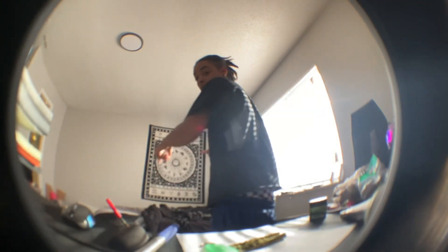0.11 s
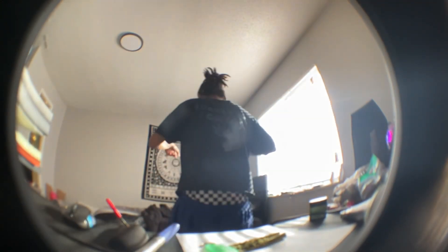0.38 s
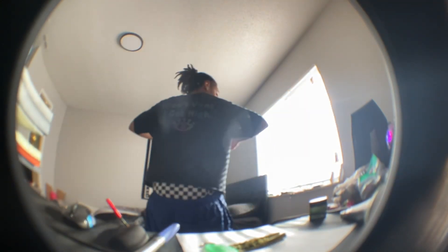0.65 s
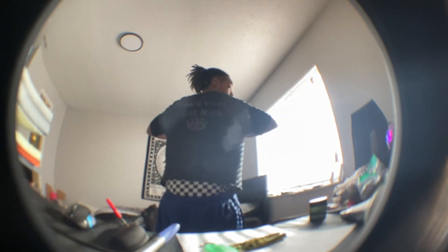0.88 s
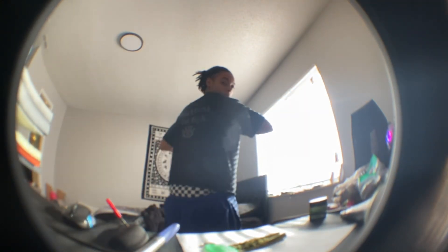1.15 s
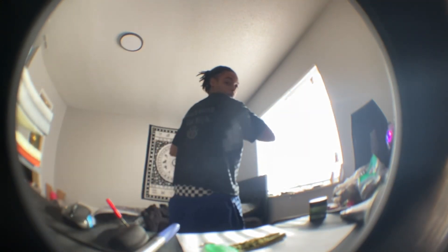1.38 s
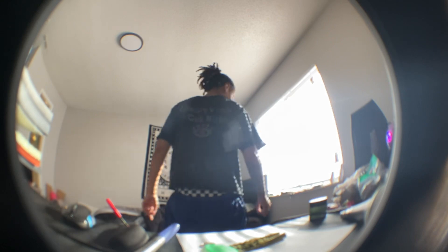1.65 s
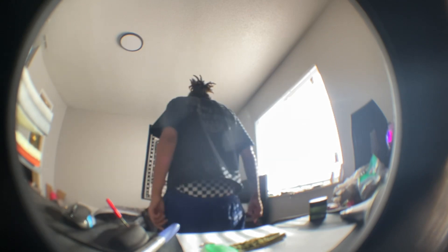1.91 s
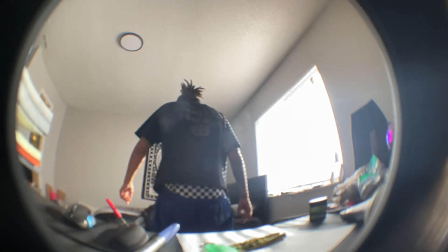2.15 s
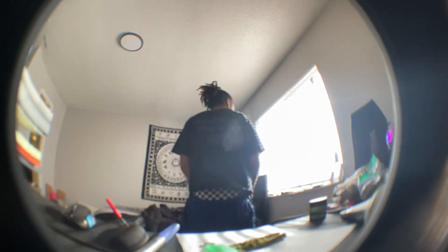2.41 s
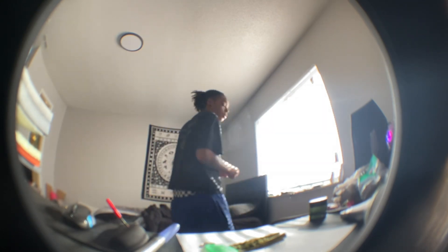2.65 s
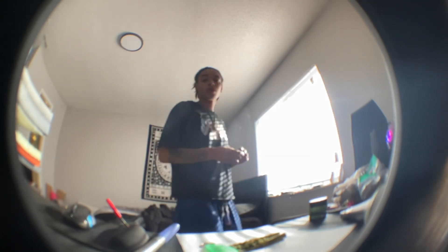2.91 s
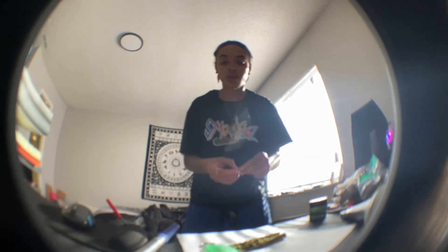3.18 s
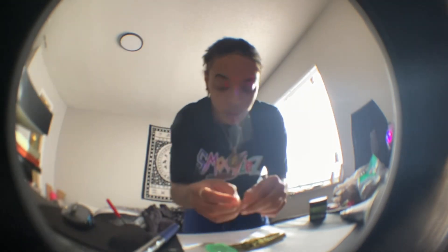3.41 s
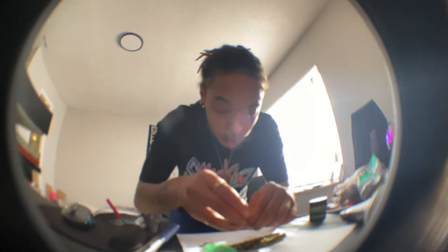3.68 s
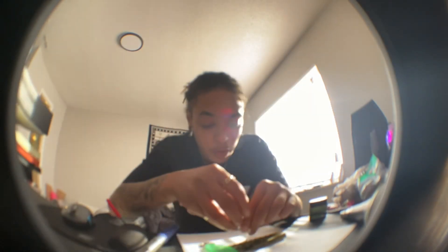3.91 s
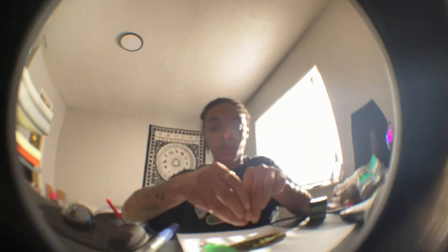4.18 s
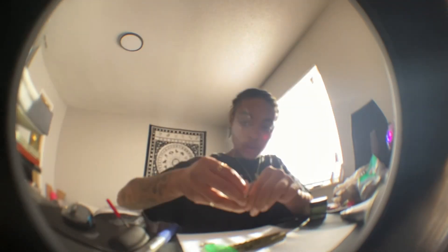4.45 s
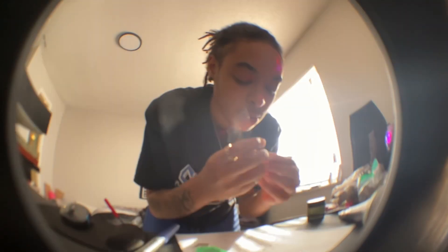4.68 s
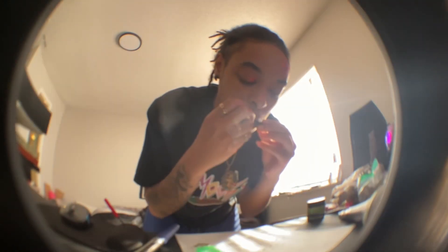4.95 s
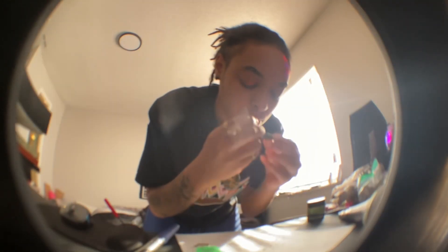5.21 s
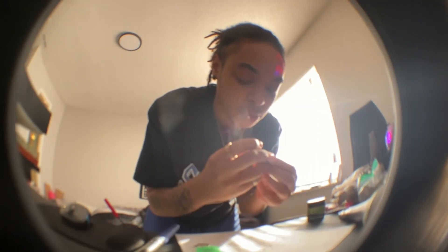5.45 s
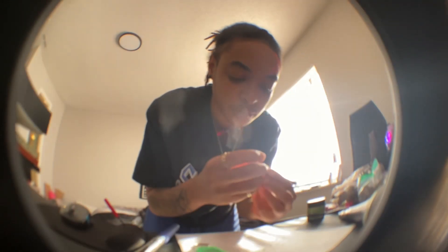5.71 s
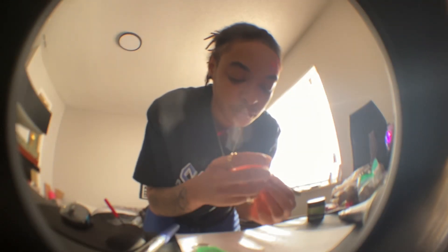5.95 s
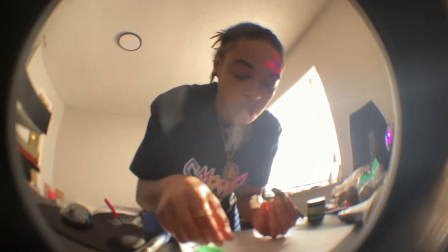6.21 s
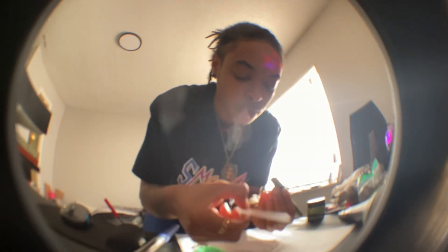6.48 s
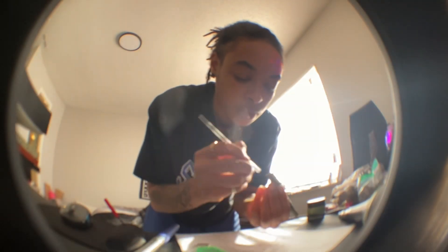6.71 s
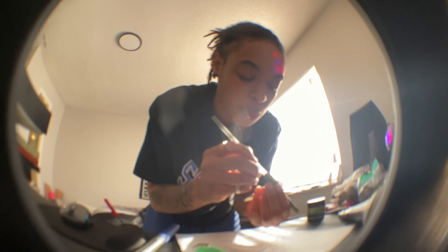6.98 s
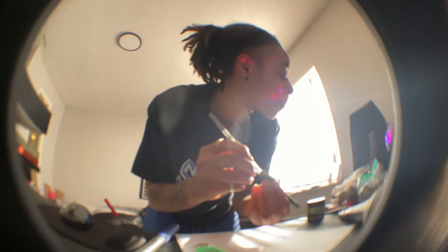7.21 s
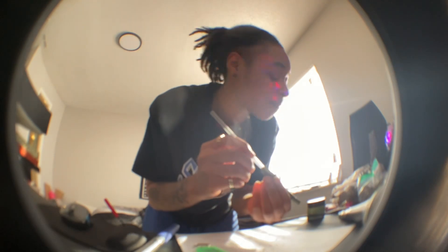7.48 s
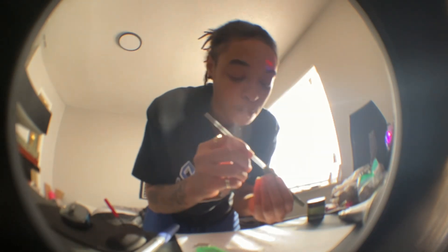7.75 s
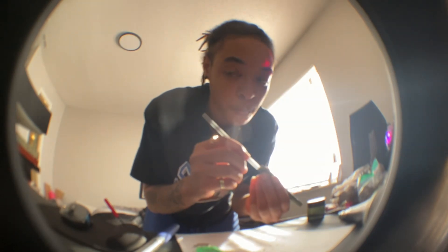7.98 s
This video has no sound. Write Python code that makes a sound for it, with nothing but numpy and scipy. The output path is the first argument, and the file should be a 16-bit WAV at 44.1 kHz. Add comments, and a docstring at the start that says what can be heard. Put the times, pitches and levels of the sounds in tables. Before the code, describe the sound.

Low pulsing ventilation hum in a quiet bedroom, soft cloth rustle and finger clicks; a brief dip, louder hum, then firm clicks and short scrapes.

```python
"""A quiet bedroom at a two-port desk microphone: ventilation hum (beating sines, filtered noise) and floor rumble.
First clothes rustle (grainy noise), with finger clicks (ringing cracks) and forearm bumps (decaying sines).
Near 4.55 s all sound dips briefly; the hum returns 6.2 dB louder and the rumble a little stronger.
Sparse clicks follow, from 6.3 s with knocks and paper strokes; near 7.2 s firm clicks and
scrapes (rapid ringing slips), then a few lighter clicks over the hum."""
import sys
import numpy as np
from scipy import signal
from scipy.fft import rfft, irfft, next_fast_len
from scipy.io import wavfile
from scipy.ndimage import uniform_filter1d, map_coordinates

SR = 44100
rng = np.random.default_rng(int(sys.argv[2]) if len(sys.argv) > 2 else 0)


def inscribe(sig):
    """Save sig as 16-bit PCM at rate SR to the path in sys.argv[1].

    A 1-D sig is mono; a 2-D sig holds one channel per row.
    Samples are clipped to [-1, 1] before scaling.
    """
    pcm = np.round(np.clip(np.atleast_2d(sig).T, -1, 1) * 32767)
    wavfile.write(sys.argv[1], SR, pcm.astype(np.int16))


def nominal_scale(level):
    """Amplitude ratio for a level in decibels (scalar or array-like)."""
    x = np.asarray(level, float) / 20
    return 10 ** x


N = 357651
TIME = np.arange(N) / SR
HANDS_LEFT_DB = 9  # left over right port: the hands work left of the microphone


def unit(x):
    """Scaled to rms 1."""
    return x / np.sqrt(np.mean(x ** 2) + 1e-20)


def mid_unit(pair):
    """Scaled so that the mean of the ports has standard deviation 1."""
    return pair / np.std(pair.mean(axis=0))


def along(points, hz):
    """(Hz, value) points interpolated on a log frequency axis."""
    point_hz, values = np.transpose(points)
    return np.interp(np.log(hz + 1), np.log(point_hz + 1), values)


def curves(rows):
    """One value per sample for each column after the time."""
    times_s, *columns = np.transpose(rows)
    return [np.interp(TIME, times_s, column) for column in columns]


def wobble(rate):
    """A smooth random curve, rate knots a second."""
    knots = rng.standard_normal(int(N * rate / SR) + 4)
    return map_coordinates(knots, [TIME * rate])


def filtered(x, response):
    """x times a complex response of frequency."""
    size = next_fast_len(x.shape[-1] + 8192)
    spectrum = rfft(x, size) * response(np.fft.rfftfreq(size, 1 / SR))
    return irfft(spectrum, size)[..., :x.shape[-1]]


def resonant(modes):
    """Causal response of (Hz, width Hz, dB) resonances, alternating in sign."""
    def mode(f, centre_hz, width_hz, db):
        damping = 1j * f * width_hz
        return nominal_scale(db) * damping / (centre_hz ** 2 - f * f + damping)
    return lambda f: sum((-1) ** k * mode(f, *row) for k, row in enumerate(modes))


def patchy(noise, depth_db):
    """Noise with random louder and softer patches in time and frequency."""
    z = signal.stft(noise, nperseg=512)[2]
    field = uniform_filter1d(rng.standard_normal(z.shape[1:]), size=5, axis=0)
    field = uniform_filter1d(field, size=9, axis=1)
    return signal.istft(z * nominal_scale(depth_db * unit(field)), nperseg=512)[1][:, :N]


def ports(source, alike, lead, balance_db):
    """Two ports: shared noise offset in phase (left leads where lead > 0), plus each port's own noise."""
    side = np.array([[.5], [-.5]])

    def shared_response(f):
        turn = np.exp(1j * side * lead(f))
        return np.sqrt(np.clip(alike(f), 0, 1)) * turn * nominal_scale(side * balance_db(f))

    def own_response(f):
        return np.sqrt(1 - np.clip(alike(f), 0, 1)) * nominal_scale(side * balance_db(f))

    return filtered(source[0], shared_response) + filtered(source[1:], own_response)


def tone(hz, left_db, right_db, lead, phase):
    """A sine with its own rms level and phase at each port."""
    angle = 2 * np.pi * hz * TIME + phase + np.array([[0], [-lead]])
    return np.sqrt(2) * nominal_scale([[left_db], [right_db]]) * np.cos(angle)


def hum():
    """Ventilation: mains buzz and fan tone beat 4.6 times a second, with other tones and booming air."""
    # stretches of hum: (start [s], gain [dB], time the beating tones cancel at the left [s])
    stretches = [(0, 0, 2.151), (4.553, 6.2, 6.4)]
    # mains buzz, fan: (frequency [Hz], left [dB before gain], right [dB before gain], left lead [rad])
    beating = [(240, -41.1, -45.7, .4), (235.385, -45.4, -54.8, .27)]
    # other tones: (frequency [Hz], left, right [dB before gain and wobble], left lead [rad before wobble])
    other_tones = [(36.02, -71, -71, .1), (57.7, -71, -71.5, -.15), (129.78, -56.3, -56.8, .15),
                   (471.6, -61, -69.5, .8), (479.98, -66.5, -74.5, 2), (516, -61.5, -70, .7),
                   (960, -69.5, -75, 1.5), (1200, -77, -80, 2)]
    # moving air spectrum: (frequency [Hz], relative density [dB per Hz])
    air_spectrum = [(22, -46), (36, -28), (85, -21), (200, -6.5), (300, -13.5), (450, -15), (700, -20.5),
                    (1000, -23.5), (1500, -27.5), (2000, -30), (2600, -42.5), (3300, -42), (6000, -53.5),
                    (16000, -65.5)]
    # where the air booms: (frequency [Hz], width [Hz], added amplitude [dB re plain air])
    room_modes = [(358.7, 29, 2.5), (632.5, 25, -1.5), (1210, 35, -3), (1600, 340, -4.5),
                  (3300, 640, -11.5)]
    # air shared by the ports: (frequency [Hz], power fraction [0-1])
    air_alike = [(22, .99), (60, .93), (120, 0.99), (300, 0.8), (700, 0.46), (2000, 0.93), (4000, 0.2),
                 (9000, .2)]
    # air phase between ports: (frequency [Hz], left lead [rad])
    air_lead = [(30, 0.1), (120, 0.8), (240, -0.5), (600, 0.73), (1290, 2.5), (2330, 4), (2670, -2.5),
                (3450, 4), (5170, 8.5)]
    # air level between ports: (frequency [Hz], left over right [dB])
    air_balance = [(25, 1.2), (120, -7), (200, 13), (380, 2.5), (700, 5), (1290, -0.5), (2380, 2.5),
                   (4400, 2.5), (15000, 0)]

    index = np.searchsorted([start for start, _, _ in stretches], TIME, "right") - 1
    gain_db, cancel_s = np.transpose(stretches)[1:, index]
    phase = rng.uniform(0, 2 * np.pi)
    buzz, fan = beating
    fan_phase = phase + np.pi + 2 * np.pi * (buzz[0] - fan[0]) * cancel_s
    pair = tone(*buzz, phase) + tone(*fan, fan_phase)
    rest = 0
    for row in other_tones:
        swell = nominal_scale(2.7 * wobble(1.97))
        rest = rest + swell * tone(*row, rng.uniform(0, 2 * np.pi) + 0.37 * wobble(1.5))

    ripple_knots = rng.standard_normal(2400)

    def air_response(f):
        boom = 1 + sum(nominal_scale(db) / (1 + (2 * (f - c) / w) ** 2) for c, w, db in room_modes)
        ripple = nominal_scale(1.33 * map_coordinates(ripple_knots, [f / 12]))  # the room's many small modes
        return nominal_scale(along(air_spectrum, f)) * boom * ripple

    noise = filtered(patchy(rng.standard_normal((3, N)), depth_db=1.65), air_response)
    air = ports(noise, lambda f: along(air_alike, f), lambda f: along(air_lead, f),
                lambda f: along(air_balance, f))
    air = nominal_scale(-48.5 + 0.24 * wobble(2.4)) * unit(air)
    return nominal_scale(gain_db) * (pair + rest + air)


def rumble():
    """The building through the floor: broad rumble and narrow drone swell together and wander apart."""
    # rumble, drone: (frequency [Hz], width [octaves], left over right [dB], level re shaking [dB], wander [dB])
    bands = [(89.4, .3, 5, -4.5, 1.5), (111.07, .039, -3.5, 0, 0.5)]
    # floor shaking, one list per hum stretch: (time [s], level [dB])
    shaking = [
        [(0, -54), (1.3, -53.5), (2.3, -48.5), (3.4, -51.5), (4.5, -49.5)],
        [(4.62, -47.5), (6.2, -51), (7.3, -49.5), (8.1, -47)],
    ]
    out = 0
    shake_db, = curves(sum(shaking, []))
    for hz, octaves, balance_db, db, wander_db in bands:
        noise = filtered(rng.standard_normal((3, N)),
                         lambda f: np.exp(-.5 * (np.log2((f + 1) / hz) / octaves) ** 2))
        pair = ports(noise, lambda f: 0.974 + 0 * f, lambda f: 0 * f, lambda f: balance_db + 0 * f)
        pair = mid_unit(pair)
        # a machine drives it: steadier than free noise
        evened = pair / (1.4 + abs(signal.hilbert(pair.mean(axis=0))))
        out = out + nominal_scale(shake_db + db + wander_db * wobble(3)) * mid_unit(evened)
    return out


def rustle():
    """Cloth, later paper: uneven tiny snaps as dull and bright hiss; strokes swell over a faint rustle."""
    # faint unbroken rustle of someone moving, from 4.6 s a steady faint hiss: (time [s], dull level [dB before
    # swing], bright over dull [dB])
    fidget = [(0, -74.5, -16), (.7, -78.5, -9), (1.25, -89, -10), (1.9, -83.5, -11), (3, -78, -15),
              (3.62, -85, -9.5), (3.9, -71.5, -13.5), (4.5, -73, -13), (4.6, -84, -5), (8.11, -84, -5.5)]
    # strokes of cloth, later paper: (peak [s], rise [s], fall [s], dull peak [dB], bright over dull [dB])
    strokes = [(.005, .05, 0.25, -61.5, -11.5), (.13, 0.091, .12, -63.5, -21),
               (.25, 0.075, 0.18, -70, -9.5), (.81, .15, 0.18, -73, -15), (1.06, .04, 0.065, -81, -3.5),
               (1.86, 0.1, .14, -76, -13), (2.04, .12, 0.14, -74, -11.5), (2.17, .08, .18, -76, -13.5),
               (2.32, .07, .25, -75, -15), (2.51, 0.086, 0.24, -72, -21), (2.64, 0.09, 0.061, -67, -20.5),
               (2.76, 0.062, 0.24, -68, -13), (3.14, 0.45, 0.36, -68.5, -14.5),
               (3.23, 0.22, 0.067, -71.5, -7), (3.34, 0.06, 0.2, -68, -16.5), (3.76, .12, .4, -71, -16),
               (3.89, .25, 0.14, -67.5, -11.5), (4.18, 0.25, .11, -70.5, 5), (4.3, .07, 0.27, -72.5, 3.5),
               (4.49, 0.3, .08, -72, -11.5), (6.345, 0.018, 0.078, -61.5, 0),
               (6.38, .05, 0.021, -66.5, -6.5), (7.14, .004, 0.088, -54.5, -17.5),
               (7.17, 0.05, .028, -53, -25.5), (7.255, 0.11, .04, -67, -5), (7.337, .003, 0.039, -43, -8),
               (7.37, 0.062, .07, -59.5, -7), (7.405, 0.055, 0.02, -65.5, -6), (7.94, .03, .04, -80.5, 3.5),
               (7.99, .009, 0.054, -65, -1)]
    # dull and bright hiss, one list each: (frequency [Hz], relative density [dB per Hz])
    hiss_spectra = [
        [(700, -18.5), (1500, 0.5), (3500, -1), (6000, -11), (9000, -11), (16000, -48)],
        [(3000, -26), (6000, -1.5), (8000, -1.5), (12500, -4.5), (14500, -4), (16000, -16)],
    ]
    swing_db, swing_rate_hz = 2, 13
    fade_db = 20  # lost over one rise or fall time

    level_db, bright_db = curves(fidget)
    steady_db = level_db + swing_db * wobble(swing_rate_hz)
    power = nominal_scale(steady_db + [0 * bright_db, bright_db]) ** 2
    for peak_s, rise_s, fall_s, db, bright_db in strokes:
        fade = np.maximum((peak_s - TIME) / rise_s, (TIME - peak_s) / fall_s)
        near = fade < 3
        power[:, near] += nominal_scale(db - fade_db * fade[near] + [[0], [bright_db]]) ** 2

    grain = nominal_scale(0.78 * wobble(900) + 1.7 * wobble(40))
    out = 0
    for part, spectrum, lead_samples in zip(power, hiss_spectra, [7.5, 3.5]):
        hiss = patchy(grain * rng.standard_normal((3, N)), depth_db=3.0)
        hiss = filtered(hiss, lambda f: nominal_scale(along(spectrum, f)))
        pair = ports(hiss, lambda f: 0.56 + 0 * f, lambda f: 2 * np.pi * f * lead_samples / SR,
                     lambda f: 5 + 0 * f)
        out = out + np.sqrt(part) * mid_unit(pair)
    return out


def room(x):
    """Room answer: noise in which each frequency dies at its own speed, 150 samples late."""
    # decay: (frequency [Hz], time to fall 60 dB [s])
    decay = [(500, 0.22), (2000, 0.27), (10000, 0.046)]
    hz, t, z = signal.stft(rng.standard_normal((2, SR // 3)), SR, nperseg=256)
    z = z * nominal_scale(-60 * t / along(decay, hz)[:, None])
    tail = signal.istft(z, SR, nperseg=256)[1]
    late = np.pad(x, (150, 0))[None]
    return signal.fftconvolve(late, tail / np.linalg.norm(tail[0]), axes=1, mode="full")


def clicks():
    """A finger crack rings the spot, the hard thing (more if firm) and its hollow part; right port first."""
    # (time [s], peak [dB before port balance], spot ring [Hz], hollow ring [dB before decay, balance], its pitch [Hz])
    touches = [(.119, -54, 3200, -42.5, 1640), (0.132, -51, 2500, -45, 1160), (0.84, -51, 2140, -70, 1500),
               (2.754, -51, 4500, -74, 1500), (2.76, -57.5, 7000, -70, 1500),
               (2.807, -48.5, 3000, -70, 1500), (4.332, -48.5, 2300, -47, 1510),
               (4.806, -45.5, 2900, -70, 1500), (4.809, -52, 4200, -70, 1500), (5.14, -61, 8500, -71, 1490),
               (5.587, -54.5, 5500, -71, 1500), (6.314, -63.5, 2010, -44, 1650),
               (6.338, -49, 12800, -41, 980), (6.342, -51, 11460, -70, 1500),
               (6.346, -44, 4500, -33.5, 1566), (6.363, -57.5, 8940, -44, 1560),
               (6.377, -54, 11000, -74, 1500), (6.689, -56, 3480, -64, 1500),
               (7.1344, -38, 3030, -32, 1210), (7.136, -44, 2000, -40, 1930), (7.149, -47, 3300, -48, 1620),
               (7.1587, -49, 3400, -46, 1300), (7.1643, -38, 3300, -37, 1000),
               (7.244, -58, 3000, -42, 1490), (7.252, -54.5, 9000, -42, 1550),
               (7.336, -31.5, 2410, -23.5, 1443), (7.34, -29, 3300, -35, 1750),
               (7.345, -45, 10300, -47, 1480), (7.611, -58.5, 7760, -73, 1510),
               (7.938, -54.5, 7960, -61, 1500), (7.9853, -44.5, 8200, -68, 1490),
               (7.9943, -58.5, 7950, -62, 1500)]
    # resonances of the hard thing: (frequency [Hz], width [Hz], relative strength [dB])
    hard_modes = [(2340, 62, -1), (3300, 150, 9), (3880, 110, -0.5), (5140, 160, -8.5), (7000, 110, -10.5),
                  (8200, 170, -10), (10300, 140, -6.5), (13200, 240, -10)]
    out, t = np.zeros((2, N + SR)), np.arange(2048) / SR
    for s, db, bright_hz, hollow_db, hollow_hz in touches:
        crack = (rng.standard_normal(len(t)) + 5 * (t == 0)) * nominal_scale(-60 * t / .004)
        spot = resonant([(bright_hz, bright_hz * .16, 0)])
        firm = np.clip((db + 50) / 8, .12, 1)
        hard = filtered(crack, lambda f: spot(f) + firm * (0.8 * resonant(hard_modes)(f) + 0.077 * (f > 1800)))
        onset = 1 - np.exp(-t / .0006)
        hollow = nominal_scale(-60 * t / .025) * np.sin(2 * np.pi * hollow_hz * t) * onset
        click = nominal_scale(db) * hard / abs(hard).max() + nominal_scale(hollow_db) * hollow
        wet = nominal_scale(-11) * room(click)
        wet[0, 5:5 + len(t)] += nominal_scale(HANDS_LEFT_DB / 2) * click
        wet[1, :len(t)] += nominal_scale(-HANDS_LEFT_DB / 2) * click
        out[:, round(s * SR):][:, :wet.shape[1]] += wet
    return out[:, :N]


def bumps():
    """A soft blow: a cycle or two of the desk top, nearly alike at both ports."""
    # knocks through the desk top: (time [s], approximate peak [dB before port balance], frequency [Hz])
    knocks = [(.13, -39, 690), (0.123, -42, 1000), (4.198, -31.5, 120), (4.317, -24, 166),
              (4.345, -29, 152), (4.373, -36, 114), (4.4646, -28.5, 358), (4.472, -30, 240),
              (6.317, -31.5, 420), (6.3367, -29, 370), (6.348, -27, 576), (6.354, -30, 490),
              (6.371, -26, 212), (7.136, -30, 680), (7.255, -35, 626), (7.336, -27.5, 716)]
    out, balance = np.zeros((2, N)), nominal_scale([[.5], [-.5]])
    for s, db, hz in knocks:
        cycles = np.maximum(TIME - s, 0) * hz
        envelope = (1 - np.exp(-cycles / .5)) * np.exp(-cycles / 0.72)
        out += nominal_scale(db) * 3.37 * balance * np.sin(2 * np.pi * cycles) * envelope
    return out


def scrape():
    """A rub in quick uneven slips; each slip rings the hollow part, whose pitch slides."""
    # one list per rub: (time [s], ring level [dB before decay, scatter and balance], pitch [Hz before scatter])
    rubs = [
        [(7.135, -55, 1280), (7.148, -35, 1390), (7.165, -43, 1336), (7.18, -43, 1280), (7.19, -35, 1260),
         (7.21, -47, 1290), (7.225, -41, 1140), (7.245, -32.5, 1133), (7.255, -40, 1500), (7.275, -77, 1300)],
        [(7.342, -44, 1650), (7.352, -34, 1495), (7.362, -35.5, 1243), (7.375, -39, 1150), (7.385, -43, 1300),
         (7.4, -62, 1240)],
    ]
    out, t = np.zeros(N + SR), np.arange(1024) / SR
    for rows in rubs:
        times_s, levels_db, pitches_hz = np.transpose(rows)
        draws = rng.standard_normal((60, 3))
        slips_s = times_s[0] + np.cumsum(0.0059 * np.exp(0.38 * draws[:, 0]))
        for s, (_, size, bend) in zip(slips_s[slips_s < times_s[-1]], draws):
            hz = np.interp(s, times_s, pitches_hz) * (1 + .05 * bend)
            db = np.interp(s, times_s, levels_db) + 1.5 * size
            ring = np.sin(2 * np.pi * hz * t) * (1 - np.exp(-t / 0.00051)) * nominal_scale(-60 * t / 0.034)
            out[round(s * SR):][:len(t)] += nominal_scale(db) * ring
    # left port 5 samples later
    return nominal_scale([[.7], [-.7]]) * np.array([np.roll(out, 5)[:N], out[:N]])


def scene():
    """All sources at the two ports."""
    return hum() + rumble() + rustle() + clicks() + bumps() + scrape()


def roll_off(x):
    """The treble ends steeply here."""
    return signal.sosfilt(signal.butter(12, 15780, fs=SR, output="sos"), x)


def record(dry):
    """The level dips briefly near 4.55 s; the band ends at 15720 Hz."""
    # level dip: (time [s], gain [linear])
    dip = [(0, 1), (4.47, 0.99), (4.525, 0.78), (4.553, 0.066), (4.62, 0.98), (8.2, 1)]
    faded = dry * curves(dip)[0]
    return roll_off(filtered(faded, lambda f: f < 15720))


dry = scene()
out = record(dry)
inscribe(out)
```